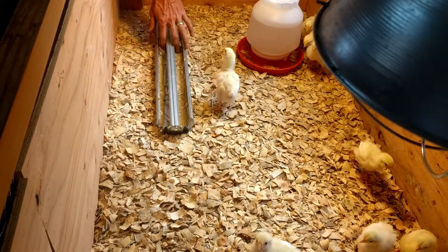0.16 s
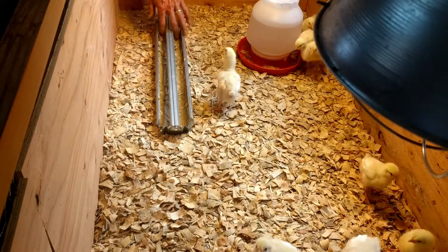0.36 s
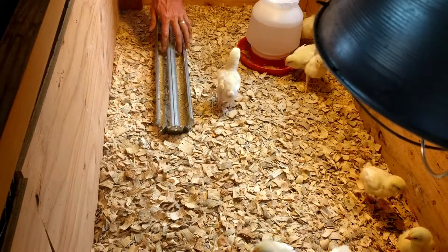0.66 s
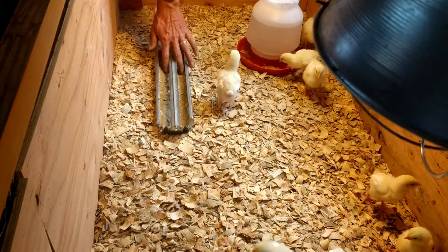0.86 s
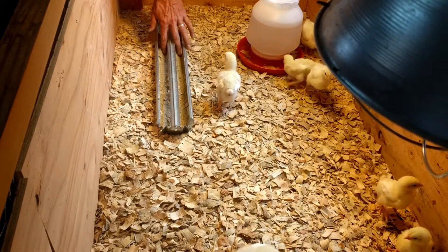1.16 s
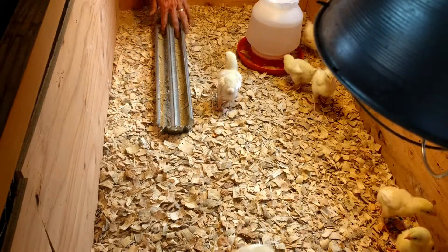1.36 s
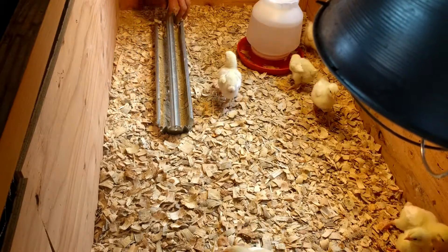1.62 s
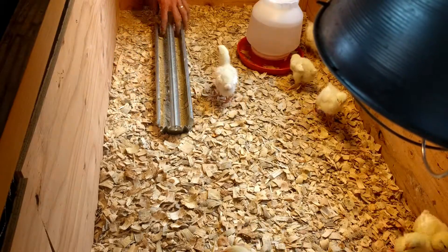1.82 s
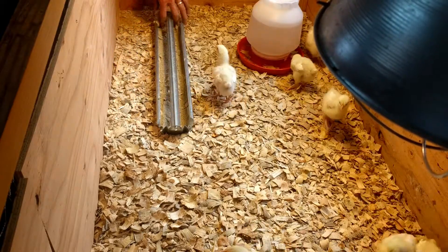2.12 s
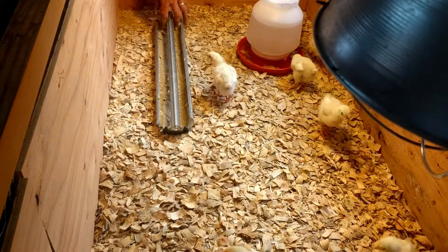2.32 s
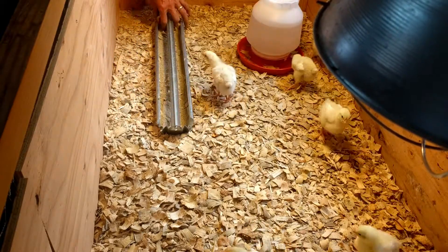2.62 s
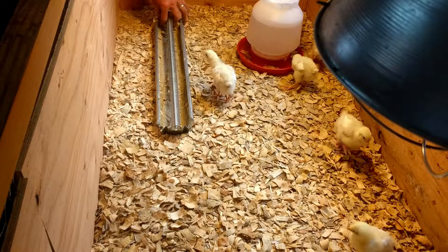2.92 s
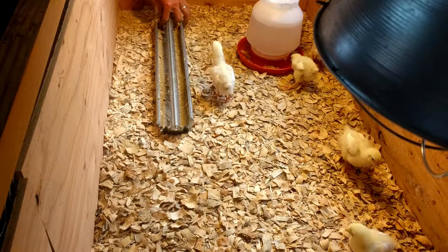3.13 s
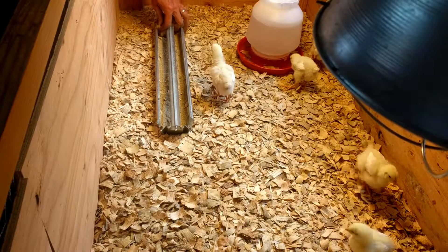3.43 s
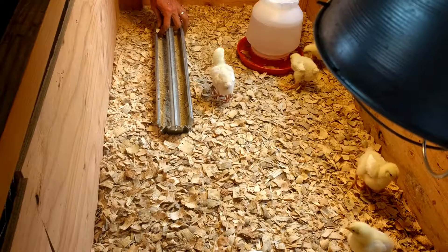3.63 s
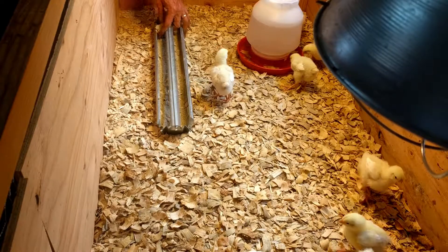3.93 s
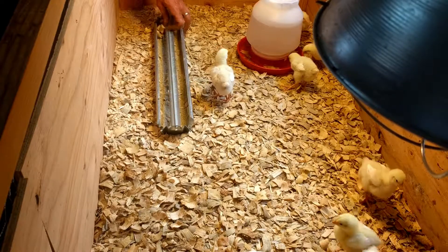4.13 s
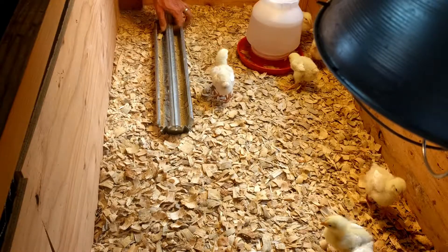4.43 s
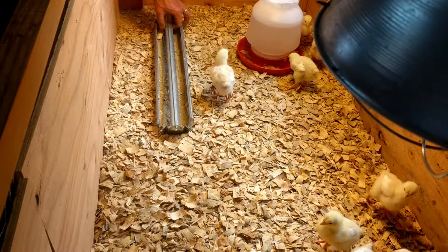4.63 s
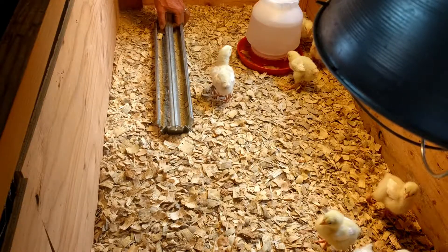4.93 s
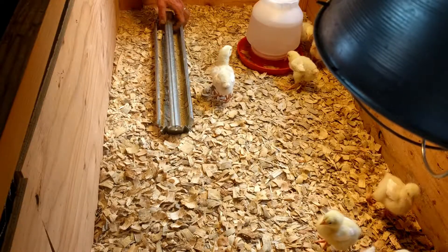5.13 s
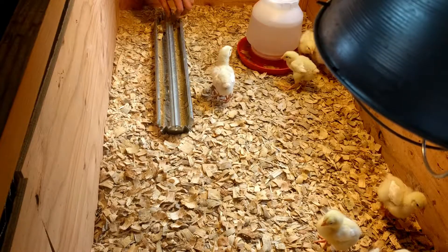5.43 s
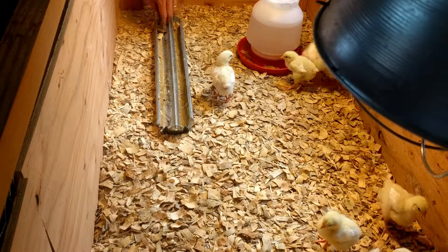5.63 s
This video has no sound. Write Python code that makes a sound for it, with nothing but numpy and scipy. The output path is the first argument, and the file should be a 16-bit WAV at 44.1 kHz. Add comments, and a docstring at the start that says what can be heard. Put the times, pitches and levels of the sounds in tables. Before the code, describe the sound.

Several young chicks peep and trill in a small wooden brooder as a sheet-metal feed trough scrapes, squeaks and clanks over crackling pine shavings.

```python
"""Young chicks peep at once, some near ones trill later: whistled tones in a small plywood brooder.
Under them pine shavings crackle, as noise and snaps, stirred and scratched by feet. A hand slides a
sheet-metal feed trough over the litter: noise through its modes hisses, single modes squeak, bursts clank.
Feet and trough thump the floor board as decaying tones and puffs; low noise rumbles behind it all.
The walls add quick echoes and a short tail; the microphone drops the deepest bass and the top treble."""
import sys
import numpy as np
from scipy import signal
from scipy.fft import rfft, irfft, next_fast_len
from scipy.io import wavfile
from scipy.ndimage import uniform_filter1d, map_coordinates

SR = 44100
rng = np.random.default_rng(int(sys.argv[2]) if len(sys.argv) > 2 else 0)


def store_wav(level_fs):
    """Save 16-bit WAV to argv[1]."""
    pcm = np.round(np.clip(np.atleast_2d(level_fs), -1, 1) * 32767)
    wavfile.write(sys.argv[1], SR, pcm.T.astype(np.int16))


N = 254016
T = np.arange(N) / SR  # s

# Levels are those of each source ahead of its own trims and filters, the walls and the microphone.
# Single falling calls: start_s, length_s, start_hz, end_hz,
# arch (share of the fall still to come at mid-call, 0-1), level_db
PEEP_CALLS = [(0.0, 0.012, 2820, 2190, 0.6, -24.5), (0.01, 0.049, 3070, 2380, 0.64, -32.5),
              (0.122, 0.084, 3320, 2580, 0.98, -33), (0.153, 0.031, 3140, 2410, 0.46, -25),
              (0.23, 0.041, 3420, 2260, .5, -28.5), (0.24, 0.051, 3570, 2464, 0.39, -27.5),
              (0.365, 0.052, 3580, 2375, .4, -24.5), (0.435, 0.076, 3846, 2830, 0.71, -33),
              (0.567, 0.073, 3235, 2360, 0.85, -31.5), (0.568, 0.081, 4020, 3230, 0.78, -34),
              (0.702, 0.043, 2940, 2305, 0.42, -29.5), (0.705, 0.03, 3150, 2800, 0.74, -41),
              (0.757, 0.033, 3060, 2150, 0.5, -32), (0.77, 0.09, 3930, 2750, 0.91, -31),
              (0.775, 0.13, 3330, 2210, 0.65, -39), (1.022, 0.031, 2830, 2400, 0.75, -34.5),
              (1.017, 0.016, 3300, 3150, .5, -41), (1.295, 0.034, 2690, 2390, .5, -41),
              (1.298, 0.068, 3300, 2260, 0.83, -29), (1.346, 0.084, 3000, 2485, 0.7, -32.5),
              (1.395, 0.031, 3100, 2680, 0.73, -32), (1.408, 0.075, 3984, 3400, 1, -30),
              (1.464, 0.034, 3070, 2250, 0.57, -30.5), (1.489, 0.025, 2740, 2360, 0.55, -30.5),
              (1.495, 0.097, 3374, 2310, 0.74, -30), (1.513, 0.025, 3920, 3400, 0.9, -33.5),
              (1.634, 0.078, 3930, 3130, 0.98, -30.5), (1.675, 0.026, 3240, 2900, .7, -37),
              (1.695, 0.032, 3060, 2470, .4, -32.5), (1.711, 0.068, 3350, 2510, 0.94, -28),
              (1.897, 0.04, 3505, 2700, 0.67, -30.5), (2.155, 0.015, 3450, 3400, .5, -42),
              (2.172, 0.097, 3500, 2630, .72, -34.5), (2.363, 0.074, 3396, 2720, 0.88, -28),
              (2.404, 0.049, 2920, 2326, 0.39, -26.5), (2.495, 0.031, 3350, 2550, 0.48, -33.5),
              (2.583, 0.059, 3560, 2270, 0.88, -29.5), (2.68, 0.049, 2690, 2260, 0.62, -32),
              (2.831, 0.064, 2890, 2590, 0.83, -41), (2.891, 0.033, 3300, 2510, 0.88, -27.5),
              (2.907, 0.047, 3240, 2450, 0.48, -28), (2.931, 0.063, 3160, 2410, 0.71, -35),
              (2.995, 0.048, 2960, 2345, .6, -29.5), (3.058, 0.049, 3314, 2370, 0.64, -27.5),
              (3.178, 0.053, 3100, 2560, 0.6, -36.5), (3.188, 0.025, 3600, 3400, .5, -44),
              (3.249, 0.04, 3050, 2880, 0.53, -40.5), (3.276, 0.0395, 3055, 2370, 0.79, -31),
              (3.375, 0.03, 3900, 3500, 0.66, -44), (3.384, 0.036, 3190, 2870, .55, -33.5),
              (3.635, 0.034, 2953, 2150, .9, -25), (3.674, 0.052, 3110, 2310, 0.63, -26.5),
              (4.921, 0.05, 2850, 2390, 0.52, -40), (5.349, 0.058, 3070, 2240, 0.74, -30),
              (5.357, 0.033, 3750, 3270, .5, -46), (5.38, 0.043, 2960, 2906, 0.48, -37),
              (5.425, 0.03, 2770, 2500, 0.53, -37), (5.49, 0.018, 3750, 3500, .9, -39),
              (5.492, 0.07, 3177, 2204, 0.87, -29), (5.55, 0.075, 3310, 2590, 0.66, -38),
              (5.553, 0.034, 2685, 2265, 0.58, -29.5), (5.621, 0.027, 3260, 3220, .5, -33.5),
              (5.622, 0.031, 3860, 3470, 0.51, -35), (5.631, 0.031, 2990, 2480, 0.62, -29.5),
              (5.646, 0.023, 3130, 2620, 0.51, -32), (5.709, 0.046, 3025, 2620, .6, -30)]
# Warbles of a near chick's trills, each a top and the dip after it: dip_s, top_hz, top_db, dip_hz, dip_db
TRILL_WARBLES = [(3.567, 3536, -30, 2740, -24.5), (3.598, 3614, -27, 2287, -31),
                 (3.638, 3940, -23.5, 3010, -14.5), (3.664, 3337, -11.5, 2278, -19.5),
                 (3.695, 3710, -26, 3090, -19), (3.72, 4220, -23.5, 2910, -14.5),
                 (3.753, 3920, -24, 2817, -9.5), (3.781, 3320, -20.5, 2600, -9.5),
                 (3.934, 3990, -24.5, 3660, -17), (3.968, 4094, -19, 2776, -10.5),
                 (3.999, 3930, -27.5, 3710, -16.5), (4.037, 4000, -21.5, 2737, -8.5),
                 (4.066, 3890, -21.5, 3510, -32), (4.093, 3880, -26.5, 3600, -21.5),
                 (4.123, 3935, -22.5, 2714, -15), (4.162, 3880, -24.5, 2056, -12),
                 (4.438, 4113, -25.5, 2820, -17), (4.467, 4010, -22, 3306, -18.5),
                 (4.498, 3810, -29, 3610, -18), (4.533, 3960, -21, 2970, -20.5),
                 (4.556, 3600, -22, 2520, -30)]
# Openings of the trills: start_s, start_hz, top_place (between two dips, 0-1), narrowness (of the dips, exponent)
TRILL_OPENINGS = [(3.55, 3400, 0.58, 1.18), (3.903, 3640, 0.51, 2.15), (4.393, 2973, .5, 2.1)]
# Clanks and scuffs of the trough: start_s, peak_db, low_ring_db (against the peak)
CLANK_HITS = [(1.21, -18.5, -24), (1.792, -32, -25), (1.8204, -4.5, -20.5), (1.987, -22, -25),
              (2.173, -19, -28), (2.2148, -5, -21), (2.3688, -24.5, -21), (2.6154, -22.5, -16),
              (2.6638, -24, -23), (2.7526, -5, -21), (2.8213, -24, -18), (2.853, -23.5, -25),
              (2.896, -28.5, -2.5), (3.025, -22, -17), (3.1234, -18, -27), (3.3624, -21.5, -15.5),
              (3.5086, -18.5, -13), (3.582, -19.5, -35), (3.63, -13.5, -19), (3.8473, -18, -13.5),
              (4.0698, -22, -13.5), (4.2013, -20, -8.5), (4.2117, -14.5, -19), (4.2744, -16.5, -28),
              (4.3377, -14, -8.5), (4.4597, -23, -21), (4.555, -19.5, -22), (4.604, -24.5, -33),
              (4.689, -22.5, -17), (4.9052, -24.5, -19), (4.9747, -30, -0.5), (5.0019, -14, -17),
              (5.0679, -23, -40), (5.0986, -6.5, -47), (5.436, -21.5, -18.5)]
# Modes of the sheet-metal trough: pitch_hz, level_db
TROUGH_MODES = [(1480, -8), (1845, 2.5), (2155, -15), (5100, -6), (5590, -4), (6030, 4), (6470, 3.5),
                (6690, 2.5), (6880, 4), (7310, 9), (7560, -22), (7980, 6), (8320, 3), (8670, 2.5),
                (9160, -1), (10900, -10), (11500, -0.5), (12000, 0), (13200, 5), (13800, -8)]
# Modes that squeak: peak_s, pitch_hz, level_db, t60_s (time to fall 60 dB)
SQUEAK_MODES = [(0.94, 11632, -13, 0.074), (0.95, 9265, -17.5, 0.21), (0.95, 11200, -21, .04),
                (0.93, 7400, -28, 0.086), (1, 1850, -35.5, 0.027), (0.73, 1824, -32.5, 0.16)]
# Steady stirring of the litter: time_s, level_db
STIR_LEVELS = [(0.0, -41.5), (0.18, -36), (0.56, -33), (0.63, -40), (0.72, -36), (0.82, -41), (0.9, -37),
               (1.02, -42.5), (1.09, -34), (1.21, -35), (1.56, -32.5), (1.66, -45.5), (1.94, -43.5),
               (2.34, -41.5), (2.93, -47), (3.19, -40), (3.6, -38.5), (3.99, -43.5), (4.45, -39.5),
               (4.8, -44.5), (5.29, -48.5), (5.76, -50)]
# Scratching feet: middle_s, half_length_s, rustle_db, dull_db
FOOT_SCRATCHES = [(0.0, 0.033, -50, -35.5), (1.546, 0.02, -48, -46), (1.829, 0.025, -33, -45),
                  (2.022, 0.017, -34, -53), (2.12, 0.053, -32, -34.5), (2.244, 0.04, -37.5, -34.5),
                  (2.457, 0.031, -55, -39.5), (2.65, 0.059, -38, -39), (2.767, 0.033, -36.5, -36),
                  (2.883, 0.07, -42, -38), (3.052, 0.078, -38, -34.5), (3.513, 0.077, -49, -38.5),
                  (3.814, 0.081, -40, -38.5), (4.217, 0.02, -32.5, -38), (4.285, 0.021, -37, -36),
                  (4.347, 0.024, -34.5, -34), (4.55, 0.084, -40, -39.5), (4.913, 0.019, -42.5, -53),
                  (4.992, 0.032, -49, -36.5), (5.102, 0.036, -34.5, -37.5), (5.388, 0.025, -60, -31),
                  (5.53, 0.03, -45, -65), (5.7, 0.043, -41, -40.5)]
# Colour of the dry flakes: pitch_hz, density_db (per Hz, relative)
FLAKE_COLOUR = [(1180, -43), (2000, -8.5), (3750, -3), (6920, -5), (9860, -12.5), (12900, -12.5),
                (15700, -12)]
# Colour of the dull part of the litter: pitch_hz, density_db (per Hz, relative)
DULL_COLOUR = [(500, -12.5), (900, -10), (1500, -1), (2500, 1), (4500, -12)]
# Blows on the floor board: start_s, peak_db, pitch_hz
BOARD_THUMPS = [(0.334, -25.5, 158), (0.513, -25.5, 190), (1.106, -32, 92), (1.21, -21, 109),
                (1.832, -34, 78.6), (2.029, -32.5, 63), (2.244, -33, 156), (2.616, -23.5, 327),
                (2.67, -34, 110), (3.034, -23, 111), (3.352, -22, 135), (3.493, -28, 88),
                (3.63, -17.5, 410), (3.77, -23, 317), (3.868, -19.5, 467), (4.115, -23, 302),
                (4.417, -27.5, 118), (4.678, -18, 438), (4.983, -29.5, 157), (5.082, -28.5, 139)]
# Colour of the low room noise: pitch_hz, density_db (per Hz, relative)
RUMBLE_COLOUR = [(15, -40), (25, -16), (43, 2), (69, 2.5), (128, -1), (166, 0), (209, -9), (374, -8.5),
                 (692, -18.5), (1200, -17), (1560, -20.5), (2640, -120)]
# Decay of the plywood box: pitch_hz, t60_s (time to fall 60 dB)
BOX_DECAY = [(300, 0.083), (2850, 0.17), (12000, 0.07)]

SWELL_DB, SWELL_DB_PER_ARCH = 12, -15.5  # end over start: straight calls swell, arched ones fade
SCOOP_HZ, SCOOP_S = 351, 0.0037  # a fully arched call slides up into its pitch from below
LEAD_DB = -40  # a trill fades in from below its first top
SLIDE_END_S = 1.62  # the trough comes to rest
DULL_DB = -47.5  # steady level of the dull part of the litter
TOP_HZ = 15750  # band limit


def peeps():
    """Each peep is one arching, falling glide of the syrinx."""
    out = np.zeros(N)
    before_s, after_s = .003, 0.00266 + 0.00086
    for start_s, length_s, start_hz, end_hz, arch, level_db in PEEP_CALLS:
        samples = int((length_s + before_s + after_s) * SR)
        u = np.linspace(-before_s / length_s, 1 + 0.00266 / length_s, samples)  # 0-1 over the call
        middle_hz = end_hz + arch * (start_hz - end_hz)
        curve = np.polyfit([0, .5, 1], [start_hz, middle_hz, end_hz], deg=2)
        scoop = SCOOP_HZ * arch ** 3 * np.exp(-u * length_s / SCOOP_S)
        swell_db = (SWELL_DB + SWELL_DB_PER_ARCH * arch) * (u - .5)
        call = whistle(np.polyval(curve, u) - scoop, level_db + swell_db,
                       octave_db=-22, growth_db=1, attack_s=0.0089, release_s=0.012)
        add(out, max(start_s - before_s, 0), call)
    return out * amp(2.38 * wobble(70) + 1.45 * wobble(300))


def trills():
    """The near chick's pitch swings between tops and dips along smooth, unevenly paced curves."""
    out, warbles = np.zeros(N), np.array(TRILL_WARBLES)
    firsts = np.searchsorted(warbles[:, 0], [row[0] for row in TRILL_OPENINGS[1:]])
    for (*start, top_place, narrowness), trill in zip(TRILL_OPENINGS, np.split(warbles, firsts)):
        turns = [(*start, LEAD_DB)]  # time_s, pitch_hz, level_db
        for dip_s, top_hz, top_db, dip_hz, dip_db in trill:
            last_s = turns[-1][0]
            turns.append((last_s + top_place * (dip_s - last_s), top_hz, top_db))
            turns.append((dip_s, dip_hz, dip_db))
        parts = []
        for a, b in zip(np.array(turns[:-1]), np.array(turns[1:])):
            u = np.linspace(0, 1, round((b[0] - a[0]) * SR))
            falling = b[1] < a[1]
            top, dip = (a, b) if falling else (b, a)
            from_top = u if falling else 1 - u
            way = np.sin(np.pi / 2 * from_top ** narrowness) ** 2  # 0 on the top, 1 in the dip
            parts.append(top[1:] + np.outer(way, dip[1:] - top[1:]))
        hz, db = np.vstack(parts).T
        add(out, turns[0][0], whistle(hz, db - 2.5, octave_db=-26, growth_db=18,
                                      attack_s=0.002, release_s=0.0018))
    return out


def whistle(hz, db, octave_db, growth_db, attack_s, release_s):
    """A syrinx tone with soft ends; its weak octave grows with the pitch."""
    t = np.arange(len(hz)) / SR
    phase = 2 * np.pi * np.cumsum(hz) / SR
    ends = np.clip(np.minimum(t / attack_s, (t[-1] - t) / release_s), 0, 1)
    octave = amp(octave_db + growth_db * np.log2(hz / 3500)) * np.sin(2 * phase)
    return np.sqrt(2) * amp(db) * ends * (np.sin(phase) + octave)


def clanks():
    """Chattering contact: a broad crack, the sheet's ring and its low modes; harder blows last longer."""
    high, low, t = np.zeros(N), np.zeros(N), np.arange(SR // 6) / SR
    for start_s, peak_db, low_ring_db in CLANK_HITS:
        t60_s = np.clip(0.049 + 0.00071 * peak_db, .01, .2)
        shape = amp(-60 * t / t60_s) * (1 - np.exp(-(t / 0.00098) ** 2))
        steps_db = rng.normal(0, 3, len(t) // 50 + 1)  # a new contact level every 50 samples
        chatter = amp(np.repeat(steps_db, 50)[:len(t)])
        crack = 0.8 + 0.79 * np.exp(-t / 0.003)  # the first contact is the hardest
        add(high, start_s, amp(peak_db) * shape * crack * chatter * rng.standard_normal(len(t)))
        add(low, start_s, amp(peak_db + low_ring_db) * shape * rng.standard_normal(len(t)))
    treble = lambda hz: amp(along([(2000, -19.0), (5000, 0.5), (15000, -8)], hz))
    bass = lambda hz: amp(along([(500, -14.5), (1100, -4.0), (1900, 7.5), (3500, -14.5), (8000, -40)], hz))
    ring = lambda hz: amp(-2.5) + amp(2.0) * sheet(hz, width_hz=49)
    bright = filtered(high, lambda hz: treble(hz) * ring(hz))
    deep = filtered(low, lambda hz: bass(hz) * ring(hz))
    return bright + amp(19.0) * deep


def squeak(swell_s):
    """The sheet sticks and slips: single modes swell, each at its own moment, then ring out."""
    scrape = filtered(rng.standard_normal(N),
                      lambda hz: (hz > 4800) * (0.6 + 2.4 * np.abs(sheet(hz, width_hz=43))))
    out = amp(-26.5) * np.exp(-.5 * ((T - .955) / 0.01) ** 2) * scrape
    for peak_s, pitch_hz, level_db, t60_s in SQUEAK_MODES:
        rise_db = 5.0 * ((peak_s - T) / swell_s) ** 2  # bell-shaped
        fall_db = 60 * (T - peak_s) / t60_s  # steady
        size_db = level_db - np.where(T < peak_s, rise_db, fall_db)
        out += amp(size_db + 2 * wobble(70)) * np.sin(2 * np.pi * pitch_hz * T)
    return out


def sheet(hz, width_hz):
    """Resonances of the trough, all equally wide, with alternating signs."""
    total = 0
    for k, (mode_hz, level_db) in enumerate(TROUGH_MODES):
        damping = 1j * hz * width_hz
        total = total + (-1) ** k * amp(level_db) * damping / (mode_hz ** 2 - hz * hz + damping)
    return total


def litter():
    """Crackling shavings; while the trough slides, a hiss through its modes takes most of the rustle."""
    rustle_gain, dull_gain = stirring()
    metal = 0.072 + 0.62 * np.clip((SLIDE_END_S - T) / 0.027, 0, 1)  # share of the rustle's power
    clumps_db = 2.96 * wobble(45)
    breaks = (rng.random(N) < 45 / SR) * rng.exponential(size=N)  # single flakes, about 45 a second
    snaps = uniform_filter1d(breaks, size=60) * 60

    def crackle(grain_db, snap):
        """Grainy, clumped noise with flakes breaking in it."""
        grains = amp(clumps_db + grain_db * wobble(400))
        return unit(rng.standard_normal(N) * (grains + snap * snaps))

    flakes = unit(filtered(crackle(-0.5, snap=0.78), lambda hz: amp(along(FLAKE_COLOUR, hz))))
    hiss_floor = lambda hz: amp(along([(1500, -32), (7000, -10.0), (15000, -13.5)], hz))
    hiss = lambda hz: np.abs(sheet(hz, width_hz=25)) + hiss_floor(hz)
    slide = unit(filtered(patchy(size=1024, db=1.5) * amp(1.0 * wobble(200)), hiss))
    body = lambda hz: amp(along(DULL_COLOUR, hz)) * (1.5 + np.abs(sheet(hz, width_hz=11)))
    dull = unit(filtered(crackle(-2.0, snap=1.0), body))
    rustle = np.sqrt(1 - metal) * flakes + np.sqrt(metal) * slide
    return rustle_gain * rustle + dull_gain * dull


def stirring():
    """Gains of rustle and dull part: steady stir plus a bell-shaped swell per scratch, summed as powers."""
    stir_db = np.interp(T, *np.transpose(STIR_LEVELS))
    power = amp(2 * np.array([stir_db, np.full(N, DULL_DB)]))
    for middle_s, half_length_s, *levels_db in FOOT_SCRATCHES:
        swell = np.exp(-((T - middle_s) / half_length_s) ** 2)
        power += np.outer(amp(2 * np.array(levels_db)), swell)
    return np.sqrt(power)


def thumps():
    """Soft blows on the floor board: a few cycles of the board and a woody puff."""
    out, puffs, t = np.zeros(N), np.zeros(N), np.arange(SR // 8) / SR
    for start_s, peak_db, pitch_hz in BOARD_THUMPS:
        rise = 1 - np.exp(-(t / 0.01) ** 4)
        t60_s = 16 / (pitch_hz + 60)  # higher tones die sooner
        add(out, start_s, amp(peak_db + 6 - 60 * t / t60_s) * rise * np.sin(2 * np.pi * pitch_hz * t))
        add(puffs, start_s, amp(peak_db + 15.5 - 60 * t / 0.071) * rise * rng.standard_normal(len(t)))
    woody = [(60, -27), (200, -0.5), (500, -3.5), (1000, -35), (3000, -60)]  # pitch_hz, level_db
    return out + filtered(puffs, lambda hz: amp(along(woody, hz)))


def rumble():
    """Lumpy low noise of the room and the stirred board."""
    noise = patchy(size=1024, db=3) * amp(4.1 * wobble(25))
    return amp(-44.5) * unit(filtered(noise, lambda hz: amp(along(RUMBLE_COLOUR, hz))))


def standing_wave(x, peak_hz, width_hz, db):
    """An air mode of the box lifts and prolongs one pitch."""
    def response(hz):
        damping = 1j * hz * width_hz
        return 1 + amp(db) * damping / (peak_hz ** 2 - hz * hz + damping)
    return filtered(x, response)


def walls(x):
    """Near walls and floor return a few quick copies that ripple and blur every glide."""
    echoes = np.zeros(SR // 40)
    delays_s = rng.uniform(.001, .022, size=7)
    echoes[(delays_s * SR).astype(int)] = amp(-11 - 700 * delays_s) * rng.choice([-1, 1], size=7)
    return x + signal.fftconvolve(x, echoes)[:N]


def box(x):
    """The plywood walls answer within milliseconds; each frequency dies at its own speed."""
    hz, t, z = signal.stft(rng.standard_normal(SR // 3), SR, nperseg=128)
    decay = amp(-60 * t / along(BOX_DECAY, hz)[:, None])
    tail = signal.istft(z * decay, SR, nperseg=128)[1]
    delayed = np.pad(x, (150, 0))  # samples
    return signal.fftconvolve(delayed, tail / np.linalg.norm(tail))[:N]


def patchy(size, db):
    """Noise whose strength wanders in patches of time and frequency."""
    z = signal.stft(rng.standard_normal(N + size), nperseg=size)[2]
    field = uniform_filter1d(rng.standard_normal(z.shape), size=3, axis=0)
    field = uniform_filter1d(field, size=5, axis=1)
    return signal.istft(z * amp(db * unit(field)), nperseg=size)[1][:N]


def wobble(rate):
    """A smooth random curve, rate knots a second."""
    return map_coordinates(rng.standard_normal(int(N * rate / SR) + 4), [T * rate])


def filtered(x, response):
    """x times a response of frequency."""
    m = next_fast_len(N + SR // 2)
    return irfft(rfft(x, m) * response(np.fft.rfftfreq(m, 1 / SR)), m)[:N]


def along(points, hz):
    """(Hz, value) points read off on a log frequency axis."""
    f, v = np.transpose(points)
    return np.interp(np.log(hz + 1), np.log(f + 1), v)


def add(track, start_s, x):
    """Mixes x into the track at start_s."""
    part = track[round(start_s * SR):][:len(x)]
    part += x[:len(part)]


def amp(db):
    """Decibels to gain."""
    return 10 ** (np.asarray(db) / 20)


def unit(x):
    """x at rms 1."""
    return x / np.sqrt(np.mean(x ** 2) + 1e-20)


def scene():
    """Voices and metal in the box, over litter, thumps and rumble."""
    voices = walls(standing_wave(peeps() + trills(), peak_hz=2786, width_hz=166, db=-5.0))
    metal = clanks() + squeak(swell_s=0.0059)
    tails = amp(-15) * box(voices) + amp(-10.5) * box(metal)
    return (voices + metal + tails + litter() + thumps() + rumble())[None]


def record(dry):
    """The microphone loses the deepest bass, below about 40 Hz; nothing passes above the band limit."""
    return filtered(dry[0], lambda hz: (hz < TOP_HZ) * hz ** 4 / (hz ** 4 + 40 ** 4))[None]


dry = scene()
out = record(dry)
store_wav(out)
```